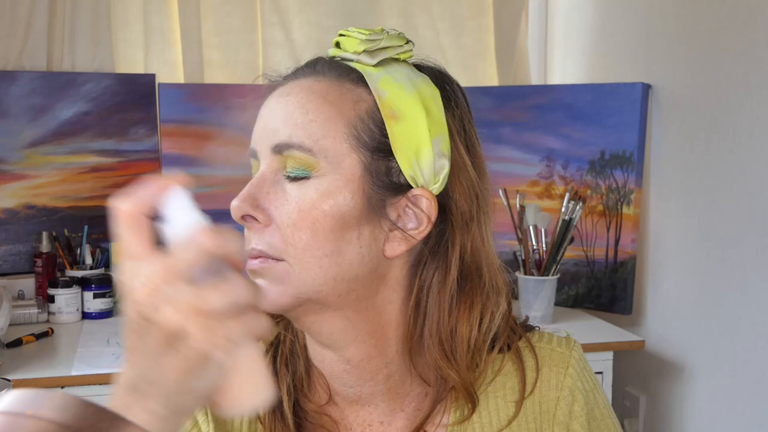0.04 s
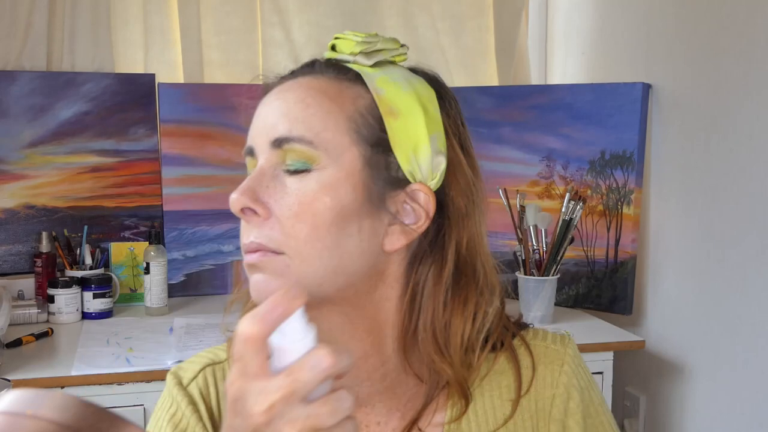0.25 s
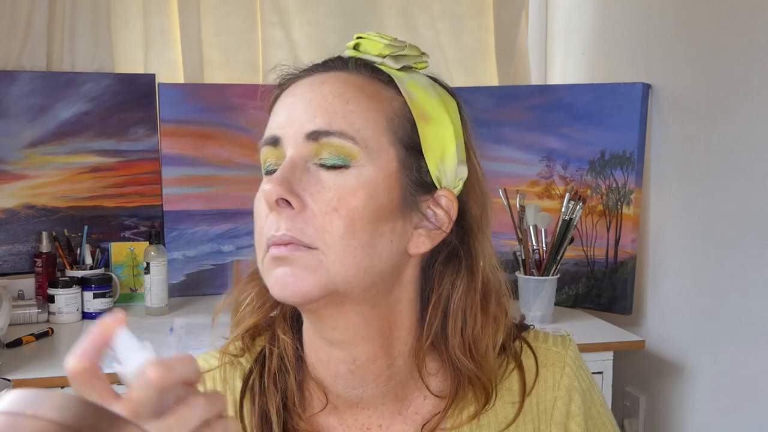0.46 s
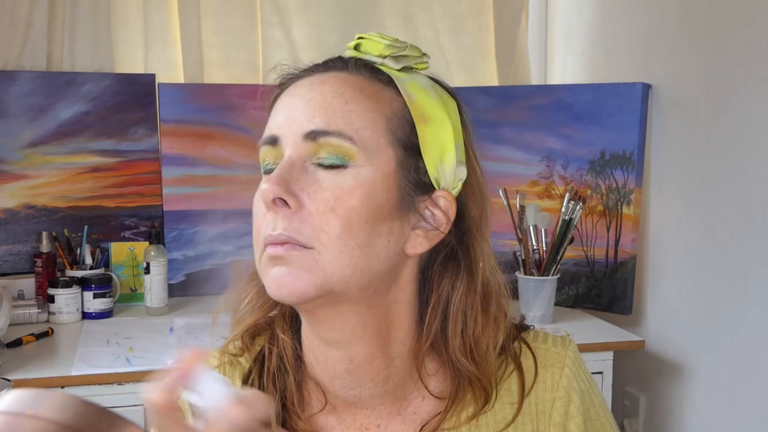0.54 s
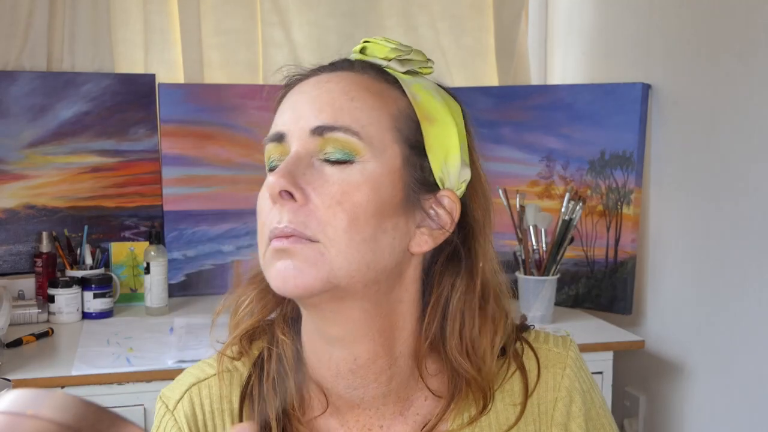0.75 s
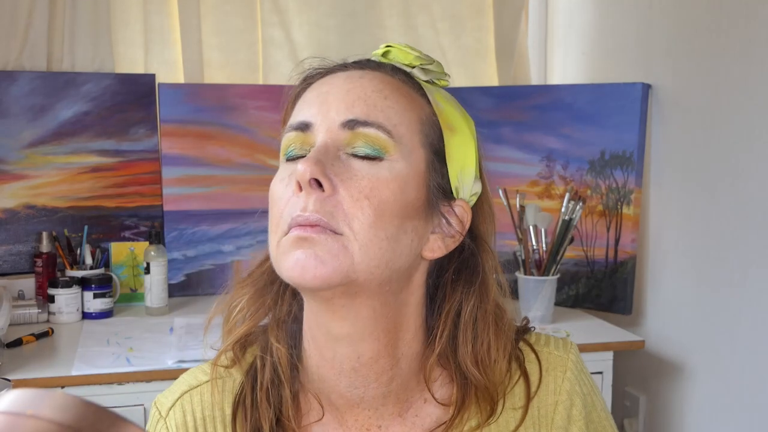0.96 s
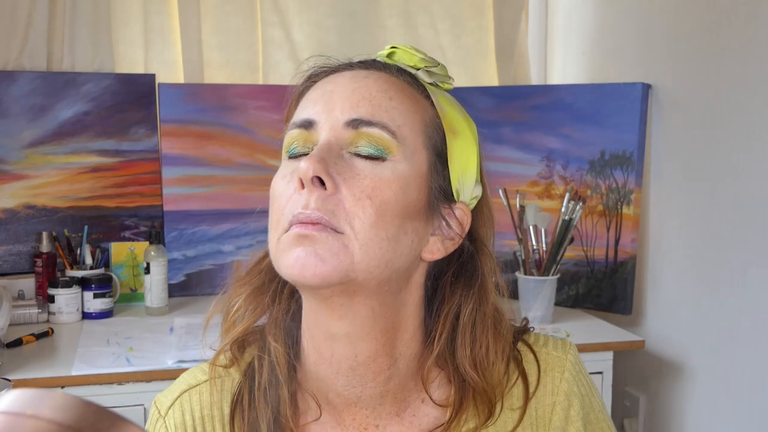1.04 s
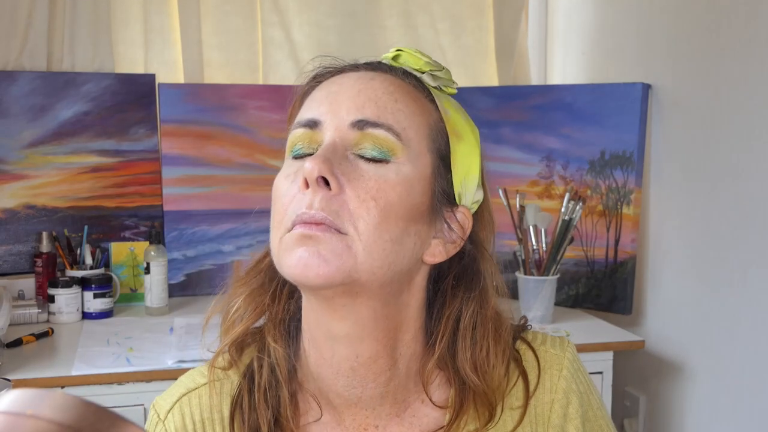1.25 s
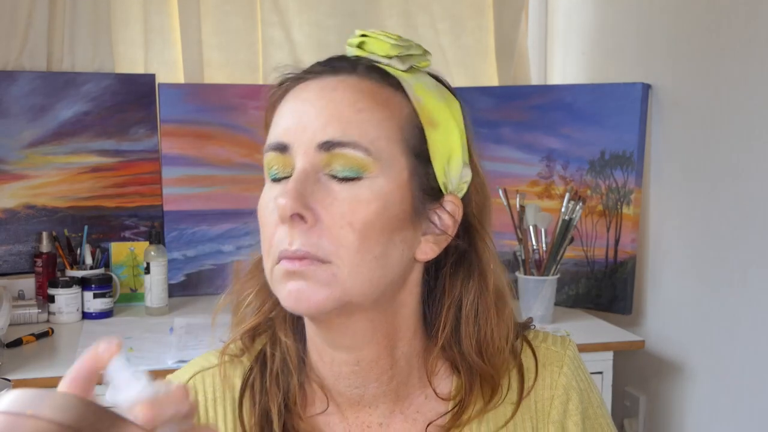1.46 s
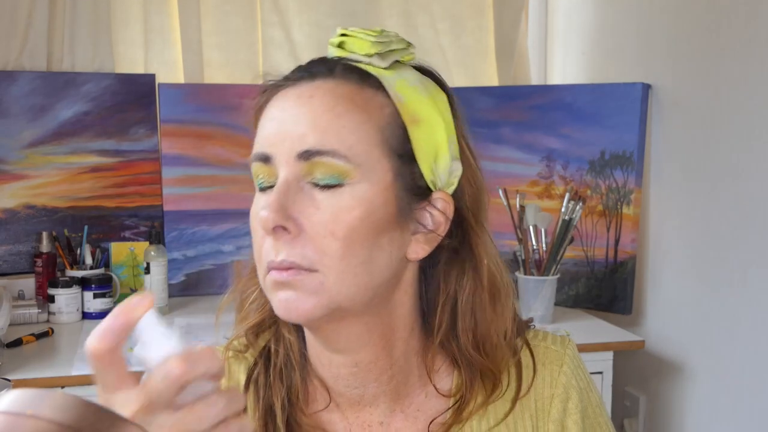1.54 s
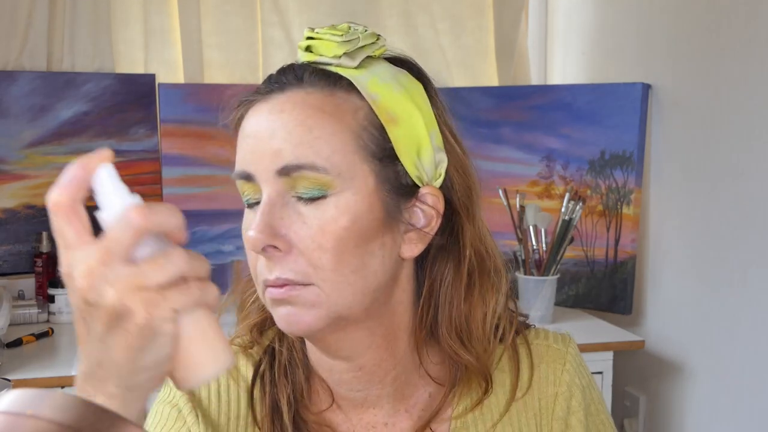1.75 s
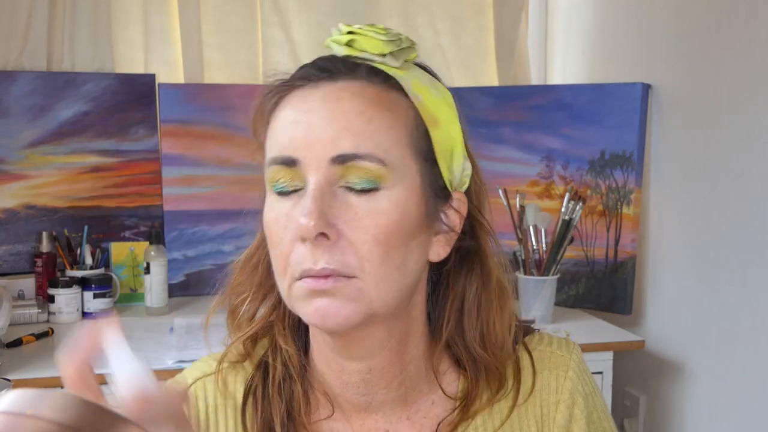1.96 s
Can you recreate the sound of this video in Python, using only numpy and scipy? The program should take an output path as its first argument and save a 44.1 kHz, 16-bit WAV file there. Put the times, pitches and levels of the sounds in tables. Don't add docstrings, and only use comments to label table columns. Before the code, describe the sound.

Beads clack and rattle inside a small plastic bottle shaken fast, close up in a quiet room

```python
import sys
import numpy as np
from scipy import signal
from scipy.fft import rfft, irfft
from scipy.io import wavfile
from scipy.ndimage import uniform_filter1d

SR = 44100
rng = np.random.default_rng(int(sys.argv[2]) if len(sys.argv) > 2 else 0)


def transcribe(u):
    v = np.clip(np.atleast_2d(u).T, -1, 1)
    q = np.round(v * 32767).astype(np.int16)
    wavfile.write(sys.argv[1], SR, q)


def to_linear_factor(level_db):
    exponent = np.asarray(level_db, float) / 20
    return 10 ** exponent


N = 88773


def evened(x):
    return x / np.sqrt(np.mean(x ** 2) + 1e-20)


def add(mix, start_s, sound):
    at = round(start_s * SR)
    part = mix[max(at, 0):][:max(len(sound) + min(at, 0), 0)]
    part += sound[max(-at, 0):][:len(part)]


def slow(seconds, count):
    size = max(round(seconds * SR), 1)
    rows = rng.standard_normal((count, N))
    for _ in range(2):
        rows = uniform_filter1d(rows, size, axis=1)
    return rows / rows.std(axis=1, keepdims=True)


def ring(x, modes, scale=1, db=0, colour_db=0, detune=0):
    out = np.zeros(len(x))
    luck = rng.standard_normal((len(modes), 2))
    for k, (hz, width_hz, level_db) in enumerate(modes):
        mode_hz = hz * scale * (1 + detune * luck[k, 0])
        pole = np.exp((-np.pi * width_hz + 2j * np.pi * mode_hz) / SR)
        gain = to_linear_factor(level_db + db + colour_db * luck[k, 1]) * width_hz / 400
        out += (-1) ** k * gain * signal.lfilter([1], [1, -pole], x).imag
    return out


def clicks(size, per_s, spread_db):
    draw = rng.random((size, 3))
    hit = draw[:, 0] < per_s / SR
    sign = np.sign(draw[:, 1] - .5)
    return hit * sign * to_linear_factor(-spread_db * np.log(draw[:, 2] + 0.025))


# f/Hz, level/(dB per Hz)
AIR_SPECTRUM = [(12, -2), (40, 0), (101, -7.5), (315, -8.5), (1010, 3), (2680, 5), (4190, -6), (7730, 5),
                (10500, -10.5), (15500, -20.5)]
# f/Hz, width/Hz, level/dB
DRONE_MODES = [(53.4, 13, -81), (124, 38, -89.5), (148.2, 13, -80.5)]
AIR_DB, AIR_SHARED, QUIET_DB = -61.5, 0.1, -7


def air():
    hz = np.fft.rfftfreq(N, 1 / SR)
    f, db = np.transpose(AIR_SPECTRUM)
    a, b, c, d = rng.standard_normal((4, N))
    pair = np.array([a, AIR_SHARED * a + np.sqrt(1 - AIR_SHARED ** 2) * b])
    colour = to_linear_factor(np.interp(np.log(hz + 1), np.log(f + 1), db))
    tone = to_linear_factor(AIR_DB) * evened(irfft(rfft(pair) * colour, N))
    low = irfft(rfft(tone) * (hz < 460), N)
    upper_low = irfft(rfft(low) * (hz > 170), N)
    drone = [sum(to_linear_factor(m[2]) * evened(ring(v, [m])) for m in DRONE_MODES)
             for v in (c + 0.88 * d, c - 0.28 * d)]
    return tone - low, low + (to_linear_factor(QUIET_DB) - 1) * upper_low + np.array(drone)


# f/Hz, width/Hz, level/dB
SLIDE_MODES = [(750, 150, -20), (1760, 460, -30), (3590, 330, 6.5), (3950, 420, 4), (4955, 420, 8),
               (6510, 960, 3.5), (7310, 184, 8), (7900, 440, 4), (8800, 2420, 3.5), (12900, 3500, -6.5),
               (14300, 12000, -17.5)]
FIZZ_DB = [6.5, -1.5, 0, -3.5, -1, -1, 2, 0.5, 0]
SLIDE_S, SLIDE_RISE_DB, SLIDE_T60_S = 0.12, 16, 0.21
SLIDE_PER_S, SLIDE_SPREAD_DB, SLIDE_SMOOTH = 2500, -5, 0.35
FIZZ_HZ, FIZZ_T60_S = 8500, 0.16
PATCH_DB, PATCH_S = 1.5, 0.033


def slide():
    t = np.arange(N) / SR
    level, fizz = np.zeros(N), np.zeros(N)
    for (s, _, _, slide_db, _), fizz_db in zip(BASE_LANDINGS, FIZZ_DB):
        before = np.clip((s - t) / SLIDE_S, 0, 1)
        after = np.maximum(t - s, 0)
        swell = to_linear_factor(slide_db - SLIDE_RISE_DB * before) * np.sqrt(1 - before ** 4)
        level += swell * to_linear_factor(-60 * after / SLIDE_T60_S)
        fizz += swell * to_linear_factor(fizz_db - 60 * after / FIZZ_T60_S)
    ticks = evened(clicks(N, SLIDE_PER_S, SLIDE_SPREAD_DB))
    drive = ticks + SLIDE_SMOOTH * rng.standard_normal(N)
    patches = to_linear_factor(PATCH_DB * slow(PATCH_S, count=len(SLIDE_MODES)))
    modes = np.array([(-1) ** k * patch * ring(drive, [mode])
                      for k, (patch, mode) in enumerate(zip(patches, SLIDE_MODES))])
    high = np.array(SLIDE_MODES)[:, :1] > FIZZ_HZ
    return (np.where(high, fizz, level) * modes).sum(0) / modes.sum(0).std()


COLOUR_DB, DETUNE = 2.0, .025
GIVE_WIDTH_HZ, WALL_LAG = 520, 40


def body(drive, modes, pitch_hz, thud_db, bright_db, chatter=0):
    thud_modes, ring_modes, wall_modes = modes
    soft = uniform_filter1d(drive, size=5)
    given = ring(soft, [(pitch_hz, GIVE_WIDTH_HZ, 0)]) * 2 * np.pi * 400 / SR
    sharp = np.roll(drive + chatter, WALL_LAG)
    thud = ring(soft, thud_modes, 1, thud_db, COLOUR_DB, DETUNE)
    main = ring(given, ring_modes, pitch_hz, 1.8, COLOUR_DB, DETUNE)
    wall = ring(sharp, wall_modes, 0.97, bright_db, COLOUR_DB, DETUNE)
    return thud + main + wall


LEAD_S, LEAD_DB, CONTACTS_PER_S = .003, -17, 2500
AFTER_S, AFTER_DB = .002, -22
CHATTER_S, CHATTER_DB = 0.0028, -9.5


def knock(peak_s, peak_db, modes, pitch_hz, thud_db, bright_db):
    t = np.arange(-600, 1800) / SR
    lead = to_linear_factor(LEAD_DB) * np.exp(t / LEAD_S)
    after = to_linear_factor(AFTER_DB) * np.exp(-t / AFTER_S)
    around = np.where(t < 0, lead, after)
    chatter = to_linear_factor(CHATTER_DB) * np.exp(-abs(t) / CHATTER_S) * clicks(len(t), 8000, 0.61)
    blow = (t == 0) + around * clicks(len(t), CONTACTS_PER_S, 5.5) * .5
    sound = body(blow, modes, pitch_hz, thud_db, bright_db - 4.5, chatter)
    envelope = abs(signal.hilbert(sound))
    return peak_s - envelope.argmax() / SR, sound * to_linear_factor(peak_db) / envelope.max()


SPOTS = (0.92, 1, 1.055)
RATTLE_PER_S, RATTLE_SPREAD_DB, RATTLE_LEAD_S, RATTLE_THUD_DB = 1300, 2, .016, -0.5
RATTLE_SAMPLES = 6000


def rattle(s, db, t60_s, modes, pitch_hz, thud_db, bright_db):
    t = np.arange(RATTLE_SAMPLES) / SR
    sound = evened(sum(body(clicks(RATTLE_SAMPLES, RATTLE_PER_S / 3, RATTLE_SPREAD_DB), modes,
                            pitch_hz * spot, thud_db, bright_db) for spot in SPOTS))
    rise = np.minimum(t / RATTLE_LEAD_S, 1) ** 2
    decay = to_linear_factor(-60 * np.maximum(t - RATTLE_LEAD_S, 0) / t60_s)
    fade = np.minimum((t[-1] - t) / 0.066, 1)
    return s - RATTLE_LEAD_S, to_linear_factor(db) * sound * rise * decay * fade


# t/s, pitch f/Hz, rattle level/dB, slide level/dB, thud level/dB
BASE_LANDINGS = [
    (.0844, 1744, -37.5, -52, 1.5),
    (0.3399, 1598, -39, -46.5, -1),
    (0.6092, 1620, -39.5, -44.5, 1.5),
    (0.8686, 1675, -38, -41.5, 2),
    (1.1414, 1680, -37.5, -43, 6.5),
    (1.4125, 1734, -41, -47, 2),
    (1.6685, 1590, -38, -49, 5),
    (1.938, 1784, -43, -49.5, -8.5),
    (2.2, 1700, -60, -51, 0),
]
# t/s, peak level/dB, brightness/dB
BASE_KNOCKS = [(0.0836, -12.5, 2), (0.0847, -32, 11.5), (0.0947, -12, -5.5), (0.1002, -26, -7),
               (0.1037, -20, 0), (0.107, -21, -12.5), (0.1132, -37, -4), (0.3393, -18, -16),
               (0.3409, -11, 3), (0.3518, -12, -3.5), (0.3553, -21.5, 3), (0.3626, -12.5, -10),
               (0.3659, -20, -4), (0.3772, -38, -1), (0.6088, -8.5, 4), (0.611, -24.5, 2),
               (0.6187, -9.5, -0.5), (0.6272, -25, 4), (0.6317, -18, -6), (0.8666, -14.5, -15),
               (0.8684, -9.5, 4.5), (0.8737, -28, -7), (0.8769, -28, 13), (0.8797, -12, -2.5),
               (0.8841, -25.5, -5), (0.8891, -25, -7), (0.8922, -14.5, -18), (1.139, -19.5, 7),
               (1.1417, -8, 5), (1.1441, -27, 11), (1.1488, -44, 7), (1.1521, -12, 0), (1.1573, -20, 17),
               (1.1613, -31.5, 11), (1.1642, -14, 5), (1.1678, -31, -4), (1.1752, -28, 4),
               (1.411, -19.5, 16), (1.4135, -12, 13), (1.4208, -21, 7), (1.4235, -13, -1),
               (1.4259, -23, 15), (1.4321, -17.5, 0.5), (1.4356, -21.5, -9), (1.4408, -30, -1),
               (1.443, -24.5, -7), (1.4491, -25, 8), (1.6689, -15, 8), (1.6739, -35, 11), (1.679, -16.5, 7),
               (1.6837, -20.5, -9), (1.687, -23, 7), (1.6899, -22.5, -14), (1.6933, -25, -7),
               (1.9382, -14, 5), (1.942, -40.5, 7)]
# t/s, pitch f/Hz, peak level/dB,
# brightness/dB
STRAY_TAPS = [(1.9353, 1733, -24, -15), (.3836, 1760, -43, -23), (.6802, 1860, -29.5, -2),
              (.945, 2070, -32.5, 4), (1.2105, 1855, -29, 3.5), (1.225, 2450, -33, -3),
              (1.236, 2560, -40.5, 4), (1.4636, 1760, -41, -8), (1.74, 2350, -36.5, -13)]
# f/Hz, width/Hz, level/dB
BASE_THUD = [(544, 38, -18.5), (699, 107, -12.5), (809.8, 144, -11.5), (1105, 160, -14), (1313, 101, -15)]
# ratio to pitch, width/Hz, level/dB
BASE_RING = [(0.938, 309, -3), (1.03, 260, 3), (1.132, 267, -1.5), (1.362, 307, -11), (1.518, 300, -18)]
# f/Hz, width/Hz, level/dB
BASE_WALL = [(2918, 340, -27.5), (3629, 270, -20.5), (3953, 210, -18.5), (5185, 170, -25), (6040, 630, -37),
             (6960, 360, -36), (8116, 210, -35), (9585, 500, -28.5), (11100, 2000, -50), (14700, 1500, -50)]
RATTLE_DELAY_S, BASE_T60_S, RATTLE_BRIGHT_DB = .018, .2, 4


def base():
    out = np.zeros(N)
    modes = (BASE_THUD, BASE_RING, BASE_WALL)
    for s, db, bright_db in BASE_KNOCKS:
        row = min(BASE_LANDINGS, key=lambda r: abs(r[0] - s + .01))
        add(out, *knock(s, db, modes, row[1], row[4], min(bright_db, 5)))
    for s, pitch_hz, db, bright_db in STRAY_TAPS:
        add(out, *knock(s, db, modes, pitch_hz, 3.9, bright_db))
    for s, pitch_hz, db, _, thud_db in BASE_LANDINGS:
        add(out, *rattle(s + RATTLE_DELAY_S, db + 0.5, BASE_T60_S, modes, pitch_hz,
                         thud_db + RATTLE_THUD_DB, RATTLE_BRIGHT_DB))
    return out


# t/s, pitch f/Hz, first touch level/dB, rattle level/dB, brightness/dB
NECK_LANDINGS = [
    (0.2094, 2196, -51, -37, -18),
    (0.4712, 2115, -24, -43.5, -20.5),
    (0.7386, 2344, -27, -42, 3.5),
    (0.9958, 1956, -35.5, -40.5, -11),
    (1.2931, 2130, -26.5, -36.5, -10.5),
    (1.5443, 2170, -47.5, -39.5, -20),
    (1.8316, 2236, -50, -43, -9),
]
# t/s, peak level/dB
NECK_TAPS = [(0.2098, -19.5), (0.2215, -41), (0.2244, -36), (0.4724, -16), (0.4754, -26.5), (0.4786, -38),
             (0.7342, -24.5), (0.7374, -33), (0.7405, -14.5), (0.7442, -27.5), (0.7479, -35), (0.752, -27),
             (0.9921, -29), (0.9962, -20.5), (0.9992, -24.5), (1.0039, -26.5), (1.0093, -39.5),
             (1.2945, -17), (1.303, -36), (1.3132, -26), (1.3206, -36.5), (1.5446, -31), (1.5478, -36),
             (1.8282, -35), (1.8306, -25.5), (1.8351, -31), (1.8387, -40.5), (1.8412, -31.5), (1.8463, -50)]
# f/Hz, width/Hz, level/dB
NECK_THUD_MODES = [(600, 80, -34), (740, 100, -21), (1065, 400, -27), (1780, 324, -9)]
# ratio to pitch, width/Hz, level/dB
NECK_RING_MODES = [(0.898, 296, -3.5), (1.012, 322, 1), (1.096, 307, -1), (1.206, 303.8, -14)]
# f/Hz, width/Hz, level/dB
NECK_WALL_MODES = [(3630, 1200, -26), (5070, 730, -23), (6340, 410, -22.5)]
TOUCH_S, NECK_DELAY_S, NECK_T60_S, NECK_TOP_HZ = 0.0099, .003, .16, 2900


def neck():
    out = np.zeros(N)
    modes = (NECK_THUD_MODES, NECK_RING_MODES, NECK_WALL_MODES)
    for s, db in NECK_TAPS + [(1.2907, -22.5)]:
        row = min(NECK_LANDINGS, key=lambda r: abs(r[0] - s))
        add(out, *knock(s, db, modes, row[1], -1.3, row[4]))
    for s, pitch_hz, touch_db, rattle_db, bright_db in NECK_LANDINGS:
        add(out, *knock(s - TOUCH_S, touch_db, modes, pitch_hz * 1.05, 0, bright_db + 7))
        add(out, *rattle(s + NECK_DELAY_S, rattle_db - 6.5, NECK_T60_S, modes, pitch_hz,
                         RATTLE_THUD_DB, bright_db))
    return signal.sosfilt(signal.butter(4, NECK_TOP_HZ, fs=SR, output="sos"), out)


ROOM_DB, ROOM_T60_S, ROOM_TOP_HZ = -13.5, 0.13, 5400


def room(x):
    t = np.arange(SR // 3) / SR
    taps = rng.standard_normal((2, len(t))) * to_linear_factor(-60 * t / ROOM_T60_S) * (t > .004)
    dull = signal.butter(1, ROOM_TOP_HZ, fs=SR, output="sos")
    taps = signal.sosfilt(dull, taps + 1.7 * taps[::-1])
    return to_linear_factor(ROOM_DB) * signal.fftconvolve(x[None], taps / np.linalg.norm(taps[0]), axes=1)[:, :N]


# t/s, then thud, ring, wall, upper wall, top phase/rad
PHASE_STEPS = [(0, -2.3, -1.6, -2.6, .8, 3.1), (.19, -2.3, -.4, -.2, 1.9, 1.3), (.29, -.9, -.9, .6, 2, 2),
               (.45, -1, -.9, -.2, 2.2, 2.8), (.53, -.9, -.9, .45, -.8, 2.8), (.71, -1.1, -.9, -.8, .2, 2.5),
               (.8, -.1, -.1, .3, -2, 1.4), (.97, -.1, 0, .15, .4, 1.6), (1.25, -.1, -.3, .5, 1.2, 3.1),
               (1.37, -.3, -.35, -2.6, .4, 3.15), (1.5, .2, .45, .4, -.5, 4.8),
               (1.63, -1.85, -1.9, -.2, -1.2, 7.6), (1.79, -1.7, -1.8, -.3, .5, 8.2),
               (1.9, -.15, -.35, 2.8, -1, 8.2)]
BAND_EDGES = (-1000, 1350, 2700, 4400, 5800, 7000, 8300, 10000, 30000)
WOBBLE_PHASE = np.array([[.6], [.7], [.17], [.3]])
GLIDE_S, WOBBLE_S, DRIFT_RAD, DRIFT_S, CROSS_HZ = 0.0094, .035, 1.02, 0.031, 120


def stereo_phase(x):
    steer = np.array(PHASE_STEPS)
    row = np.searchsorted(steer[:, 0], np.arange(N) / SR, "right").clip(1) - 1
    held = uniform_filter1d(steer[row, 1:].T, round(GLIDE_S * SR), axis=1)
    free = 2 + DRIFT_RAD * slow(DRIFT_S, count=2)
    wobble = WOBBLE_PHASE * slow(WOBBLE_S, count=4)
    turns = [*held[:2], *(held[2:4] + wobble[:2]), *free, *(held[4] + wobble[2:])]
    hz = np.fft.fftfreq(N, 1 / SR)
    positive = 2 * np.fft.fft(x) * (hz > 0)
    out = np.zeros((2, N))
    for lo, hi, turn in zip(BAND_EDGES, BAND_EDGES[1:], turns):
        weight = (np.tanh((hz - lo) / CROSS_HZ) - np.tanh((hz - hi) / CROSS_HZ)) / 2
        band = np.fft.ifft(positive * weight)
        out += np.array([(band * np.exp(.5j * turn)).real, (band * np.exp(-.5j * turn)).real])
    return out


def scene():
    tone, drone = air()
    thin = signal.butter(6, 556.5, "high", fs=SR, output="sos")
    bottle = signal.sosfilt(thin, slide() + base() + neck())
    around = room(bottle) + tone
    mid = around.mean(0)
    return stereo_phase(bottle + 1.22 * mid) + .5 * (around - mid) + drone


def low_pass(x):
    return signal.sosfilt(signal.butter(12, 15760, fs=SR, output="sos"), x)


def record(dry):
    limited = irfft(rfft(dry) * (np.fft.rfftfreq(N, 1 / SR) < 15760), N)
    return low_pass(limited)


dry = scene()
out = record(dry)
transcribe(out)
```